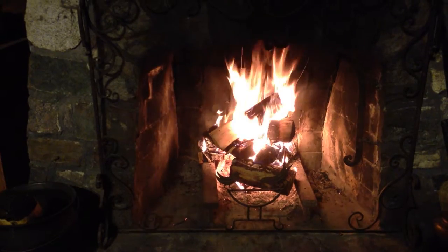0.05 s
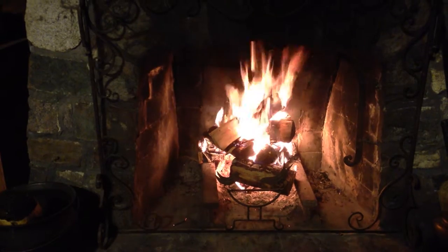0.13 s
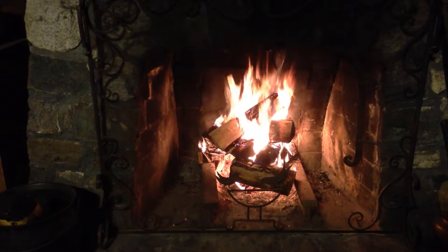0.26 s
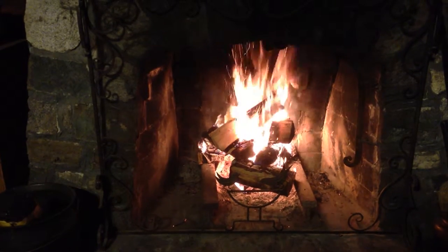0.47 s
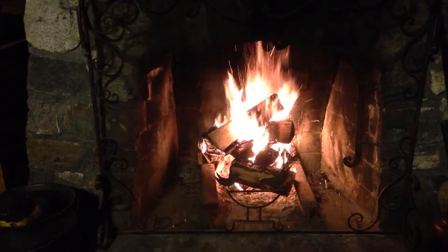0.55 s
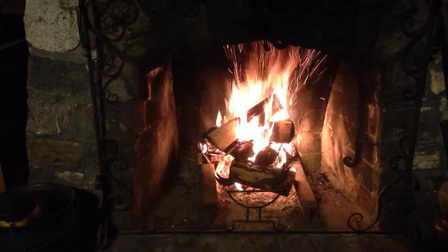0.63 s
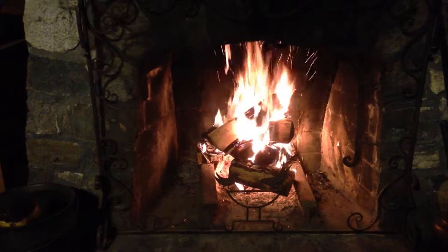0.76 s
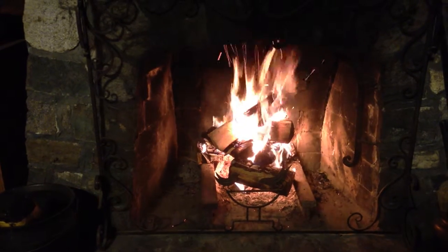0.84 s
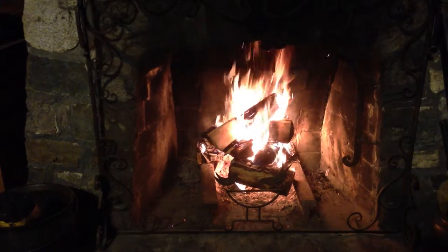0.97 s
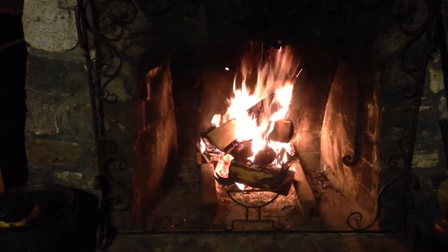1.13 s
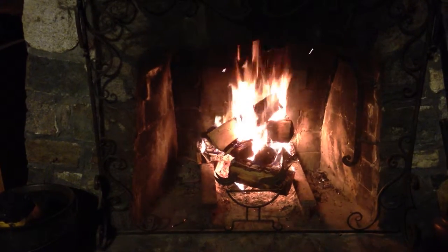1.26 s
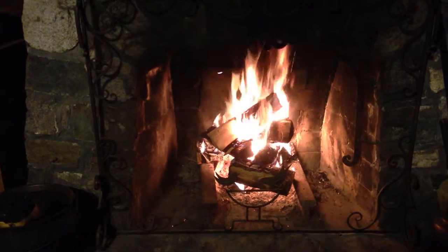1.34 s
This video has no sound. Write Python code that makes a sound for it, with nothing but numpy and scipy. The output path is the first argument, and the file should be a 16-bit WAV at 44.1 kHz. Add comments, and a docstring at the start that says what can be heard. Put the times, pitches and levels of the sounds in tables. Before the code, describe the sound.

Log fire in an indoor stone fireplace: small ticks, then three strong sharp cracks in the first half second or so, later sparse weaker pops, over barely audible flame rumble and hiss, one microphone, short room tail.

```python
"""Crackling log fire

Logs burn in a stone fireplace. Flames rumble and flutter low over a faint hiss, both made of shaped noise.
Pockets of sap burst as sharp pops: a click and a short splitting noise ring through crack and wood tones.
The firebox walls answer within milliseconds and the room a little later.
Puffs of gas push out now and then, each a soft damped swing with a short dull rush of noise."""
import sys
import numpy as np
from scipy import signal
from scipy.fft import rfft, irfft, next_fast_len
from scipy.io import wavfile
from scipy.ndimage import map_coordinates

SR = 44100
rng = np.random.default_rng(int(sys.argv[2]) if len(sys.argv) > 2 else 0)


def gain_from_decibels(decibels):
    """Convert decibel values to linear amplitude factors."""
    exponent = np.asarray(decibels, float) / 20
    return 10 ** exponent


def bounce(signal):
    """Save signal as a 16-bit WAV file at the path given by the first command-line argument."""
    frames = np.transpose(np.atleast_2d(signal))
    limited = np.clip(frames, -1, 1)
    pcm = np.round(limited * 32767).astype(np.int16)
    wavfile.write(sys.argv[1], SR, pcm)


N = 61739  # length in samples

# shape of the flame rumble's spectrum: (frequency [Hz], relative level [dB])
FLAME_SPECTRUM = [(15, -57), (25, -8.5), (70, -2.5), (113, 3), (325, -15.5), (354, -16.5), (501, -31.5),
                  (576, -29.5), (700, -26.5), (910, -69), (1540, -120)]
# slow rise and fall of the rumble: (time [s], gain [dB])
FLAME_SWELL = [(0, -0.1), (.2, 1.5), (.4, -3.3), (.6, 1.5), (.8, -4.7), (1.0, -3.3), (1.2, -0.1),
               (1.4, 0.4)]
# shape of the hiss's spectrum: (frequency [Hz], relative level [dB])
HISS_SPECTRUM = [(350, -36.5), (600, -9), (1000, -13), (2000, -14.5), (4500, -12), (9000, -15),
                 (15200, -14.5), (16000, -19)]
# slow rise and fall of the hiss: (time [s], gain [dB])
HISS_SWELL = [(0, -8.9), (.3, -8.5), (.8, -10.5), (1.4, -11.5)]
# when each pop bursts: (time [s])
POP_TIMES = [.1655, .180, .1915, .2031, .2662, .2713, .3587, .5345, .5572, .5614, .6605, .7993, .8315,
             .8357, .8718, .9575, 1.2524]
# what each pop sounds like: (peak of the direct snap [dB], crack centre [Hz], wood tone [Hz], wood level [dB],
# broad treble level [dB], splitting length [s], room level [dB])
POP_SOUNDS = [(-49, 5500, 4300, -5, -6, 0.0015, -7), (-46.5, 9000, 1900, -31, -11, 0.00092, -12),
              (-40.5, 11000, 2700, 5, -5, 0.00013, -20), (-1.5, 13000, 1590, -5, -14.5, 0.00036, -15.5),
              (-23, 26300, 2600, 3, -13, 0.00024, -12.5), (-33.5, 10000, 2200, 3.5, -11, 0.00055, -11.5),
              (-5, 7370, 2300, 0.5, -15.5, .0009, -13), (-50.5, 5000, 2100, -6.5, -6.5, .0008, -9.5),
              (-0.5, 5020, 890, -3, -16.5, 0.002, -16), (-12, 5300, 2100, -12, -6, .0004, -5.5),
              (-33, 4900, 2100, -6, 40, 0.0024, -27), (-29, 3930, 1800, 2, -8, 0.0005, -19),
              (-42, 13000, 2100, -28, -3, .0009, -18), (-43, 8120, 2400, -21.5, 3, 0.00065, -19),
              (-42, 15000, 1700, -11, -5, 0.00042, -26), (-21.5, 5600, 1760, -1, -30, 0.0014, -14.5),
              (-36, 5550, 1870, 4.5, -17, .0014, -15.5)]
# single echoes off the firebox walls: (delay [s], level [dB])
WALL_ECHOES = [(.0021, -16), (.0043, -13), (.0068, -18)]
# how long the room takes to die away by 60 dB: (frequency [Hz], time [s])
ROOM_DECAY = [(300, 0.21), (1400, 0.26), (4000, 0.27), (9000, 0.47), (15000, 0.18)]
# which pitches the room favours: (frequency [Hz], relative level [dB])
ROOM_TONE = [(300, 9.5), (1200, -1), (4000, 1.5), (9000, -8.5), (15000, -3)]
# puffs of gas: (time [s], swing level before damping [dB], pitch [Hz], starting level of the rush [dB])
GAS_PUFFS = [(.2737, -35, 162, -46.5), (0.357, -41, 236, -39), (0.5589, -27.5, 143.7, -33),
             (0.957, -37, 191, -46.5)]

FLAME_DB, HISS_DB = -58.5, -61  # base levels, before the swells
FLUTTER_DB, FLUTTER_RATE_HZ = -2.5, 18  # size of the random gain steps, and how many a second
SPLIT_DB = -5  # splitting noise against the first click
CRACK_Q, WOOD_Q = 1.3, 1.5  # sharpness of the two tones
LOW_CUT_HZ, LOW_CUT_Q = 1200, 0.9  # the pops thin out steeply below
BOX_DB, BOX_BUILD_S, BOX_T60_S, BOX_DULL_HZ = -6, 0.0015, 0.032, 9000  # blurred firebox answer
ROOM_BUILD_S = 0.014
PUFF_CYCLES = 0.8  # swings until a puff falls to about a third
RUSH_HZ, RUSH_Q, RUSH_T60_S, RUSH_ROOM_DB = 695, 0.5, 0.044, -12
CLIP_TOP, CLIP_HARD = 0.72, 6  # ceiling of the input, and how abruptly it is reached
RUMBLE_CUT_HZ, DULLS_HZ, TOP_HZ = 44, 14600, 15400  # low cut, treble droop, steep upper edge


def unit(x):
    """Scale a sound to an average (rms) strength of 1."""
    return x / np.sqrt(np.mean(x ** 2) + 1e-20)


def along(points, hz):
    """Read a curve of (frequency, value) points on a log frequency axis."""
    f, v = np.transpose(points)
    return np.interp(np.log(hz + 1), np.log(f + 1), v)


def filtered(x, response):
    """Multiply each frequency of x by a response, with spare room for the ringing."""
    m = next_fast_len(len(x) + 8192)
    spectrum = rfft(x, m) * response(np.fft.rfftfreq(m, 1 / SR))
    return irfft(spectrum, m)[:len(x)]


def resonance(f, hz, q):
    """A tone that rings when struck: a peak at hz, narrower for a larger q."""
    damping = 1j * f * hz / q
    return damping / (hz * hz - f * f + damping)


def level(points):
    """Gain for every sample from (time, gain in dB) points."""
    return gain_from_decibels(np.interp(np.arange(N) / SR, *np.transpose(points)))


def shaped_noise(spectrum):
    """Steady random noise with the given spectrum, at rms 1."""
    return unit(filtered(rng.standard_normal(N), lambda f: gain_from_decibels(along(spectrum, f))))


def flames():
    """Low turbulent rumble whose strength flutters at random, and a faint smooth hiss."""
    steps = rng.standard_normal(40)
    flutter = map_coordinates(steps, [np.arange(N) * FLUTTER_RATE_HZ / SR])  # smooth curve through them
    rumble = unit(shaped_noise(FLAME_SPECTRUM) * gain_from_decibels(FLUTTER_DB * flutter))
    rumble = gain_from_decibels(FLAME_DB) * rumble * level(FLAME_SWELL)
    hiss = gain_from_decibels(HISS_DB) * shaped_noise(HISS_SPECTRUM) * level(HISS_SWELL)
    return rumble + hiss


def firebox():
    """The blurred answer of the firebox: dulled noise that builds up and dies away fast."""
    t = np.arange(SR // 10) / SR
    box = rng.standard_normal(len(t)) * gain_from_decibels(-60 * t / BOX_T60_S) * (1 - np.exp(-t / BOX_BUILD_S))
    box = filtered(box, lambda f: 1 / (1 + 1j * f / BOX_DULL_HZ))
    return box / np.linalg.norm(box)


def room():
    """A fresh noise tail that builds up, each frequency dying at its own speed."""
    hz, t, z = signal.stft(rng.standard_normal(SR // 2), SR, nperseg=256)
    tone_db = along(ROOM_TONE, hz)[:, None]
    decay_db = -60 * t / along(ROOM_DECAY, hz)[:, None]
    z = z * gain_from_decibels(tone_db + decay_db)
    tail = signal.istft(z * (1 - np.exp(-t / ROOM_BUILD_S)), SR, nperseg=256)[1][:SR // 2]
    return tail / np.linalg.norm(tail)


def pop_colour(f, crack_hz, wood_hz, wood_db, treble_db):
    """Response of the splitting log: crack tone, broad treble and reversed wood tone, thinned below."""
    crack = resonance(f, crack_hz, CRACK_Q)
    treble = gain_from_decibels(treble_db) * 1j * f / (crack_hz + 1j * f)
    wood = gain_from_decibels(wood_db) * resonance(f, wood_hz, WOOD_Q)
    s = 1j * f + 1  # the 1 avoids dividing by zero
    low_cut = 1 / (1 + LOW_CUT_HZ / LOW_CUT_Q / s + (LOW_CUT_HZ / s) ** 2) ** 3
    return (crack + treble - wood) * low_cut


def pops():
    """A click and short splitting noise through crack and wood tones, then firebox and room."""
    out = np.zeros(N + 2 * SR)
    t = np.arange(SR // 10) / SR
    walls = np.zeros(SR // 100)
    walls[0] = 1  # the direct sound
    for delay, wall_db in WALL_ECHOES:
        walls[round(delay * SR)] = gain_from_decibels(wall_db)
    for start, sound in zip(POP_TIMES, POP_SOUNDS):
        peak_db, crack_hz, wood_hz, wood_db, treble_db, last, room_db = sound
        colour = lambda f: pop_colour(f, crack_hz, wood_hz, wood_db, treble_db)
        burst = gain_from_decibels(SPLIT_DB) * rng.standard_normal(len(t)) * np.exp(-(t / last) ** 4)
        burst[0] = 1  # the click
        snap = filtered(burst, colour)
        box = gain_from_decibels(BOX_DB) * firebox()
        diffuse = gain_from_decibels(room_db) * room()
        diffuse[:len(t)] += box
        pop = np.linalg.norm(burst) * filtered(diffuse, colour)  # stronger bursts wake more room
        pop[:len(t)] += np.convolve(snap, walls)[:len(t)]
        first = round(start * SR)
        out[first:first + len(pop)] += gain_from_decibels(peak_db) * pop / np.abs(snap).max()
    return out[:N]


def puffs():
    """A low push of gas, a soft damped swing, with a short dull rush that the room answers."""
    t = np.arange(N) / SR
    push, rush = np.zeros(N), np.zeros(N)
    for start, push_db, hz, rush_db in GAS_PUFFS:
        age = np.maximum(t - start, 0)
        push += gain_from_decibels(push_db) * np.sin(2 * np.pi * hz * age) * np.exp(-age * hz / PUFF_CYCLES)
        rush += gain_from_decibels(rush_db - 60 * age / RUSH_T60_S) * (age > 0)
    dull = lambda f: resonance(f, RUSH_HZ, RUSH_Q) / (1 + 1j * f / (2 * RUSH_HZ))
    rush *= unit(filtered(rng.standard_normal(N), dull))
    answer = gain_from_decibels(RUSH_ROOM_DB) * signal.fftconvolve(rush, room())[:N]
    return push + rush + answer


def scene():
    """Pops, puffs and flames together at one microphone."""
    return (pops() + puffs() + flames())[None]


def microphone_band(f):
    """Response of the microphone: rumble removed, treble drooping, then a steep upper edge."""
    low_cut = (1j * f / (RUMBLE_CUT_HZ + 1j * f)) ** 2
    droop = 1 / np.sqrt(1 + (f / DULLS_HZ) ** 6)
    edge = 1 / np.sqrt(1 + (f / TOP_HZ) ** 200)
    return low_cut * droop * edge


def low_pass(x):
    """Removes everything above the highest recorded frequency."""
    return signal.sosfilt(signal.butter(12, 16570, fs=SR, output="sos"), x)


def record(dry):
    """The input saturates softly and the microphone keeps a limited band."""
    soft = dry / (1 + np.abs(dry / CLIP_TOP) ** CLIP_HARD) ** (1 / CLIP_HARD)
    mix = filtered(soft[0], microphone_band)[None]
    return low_pass(mix)


dry = scene()
out = record(dry)
bounce(out)
```